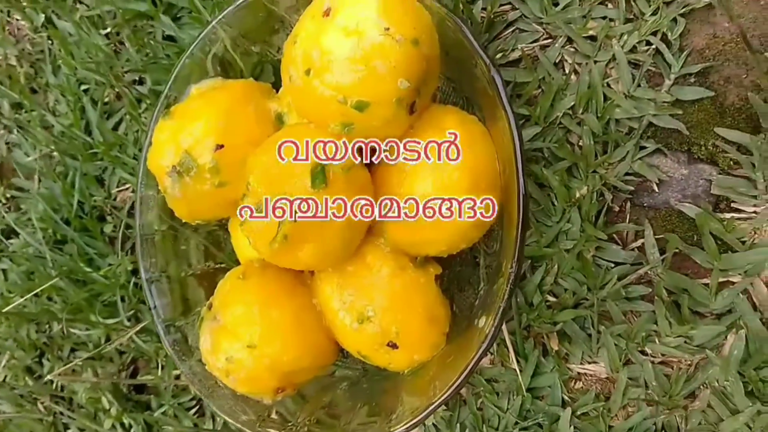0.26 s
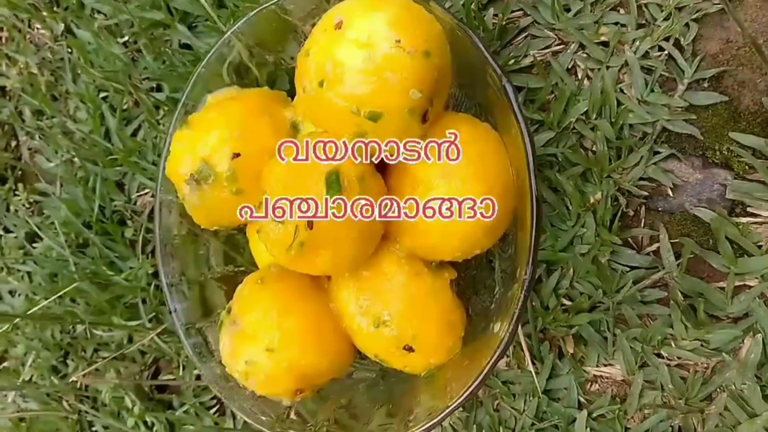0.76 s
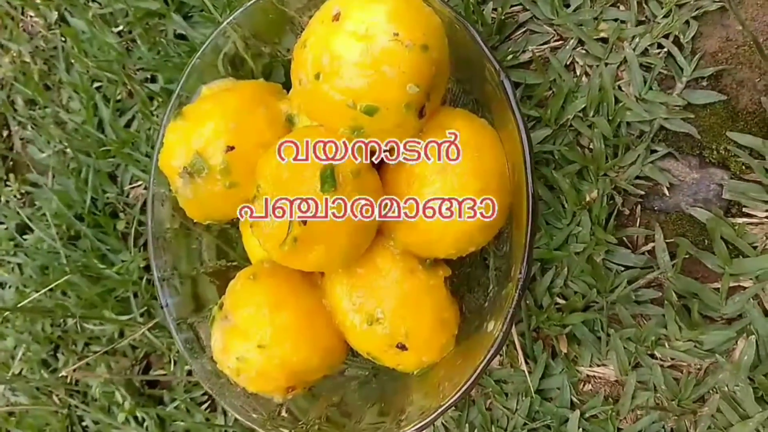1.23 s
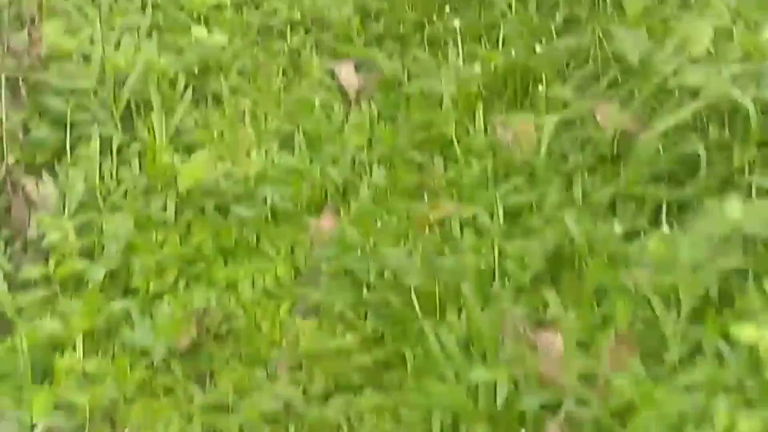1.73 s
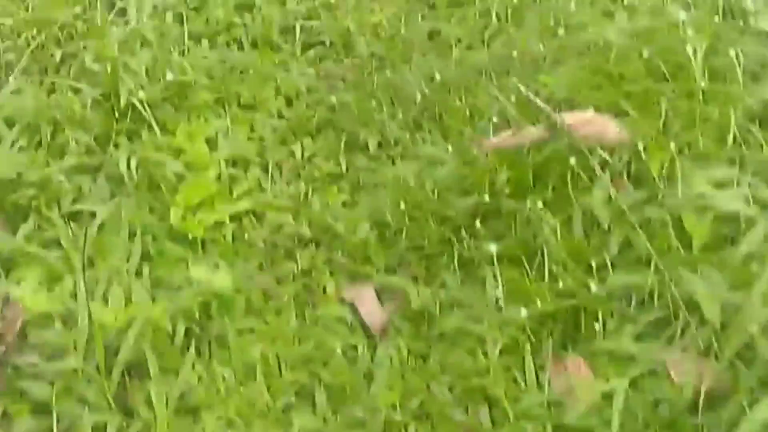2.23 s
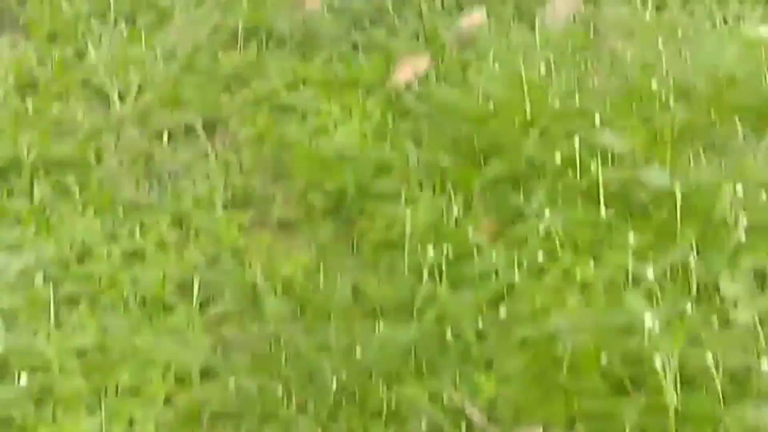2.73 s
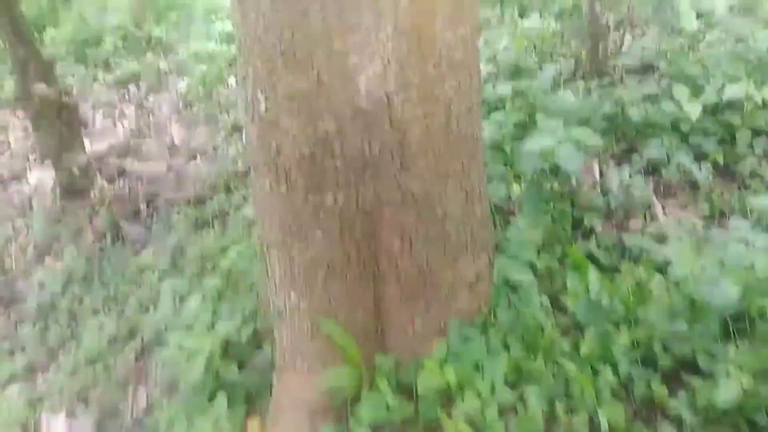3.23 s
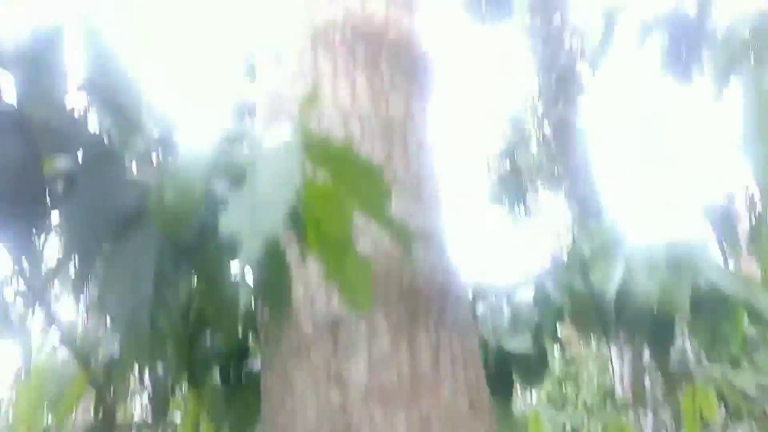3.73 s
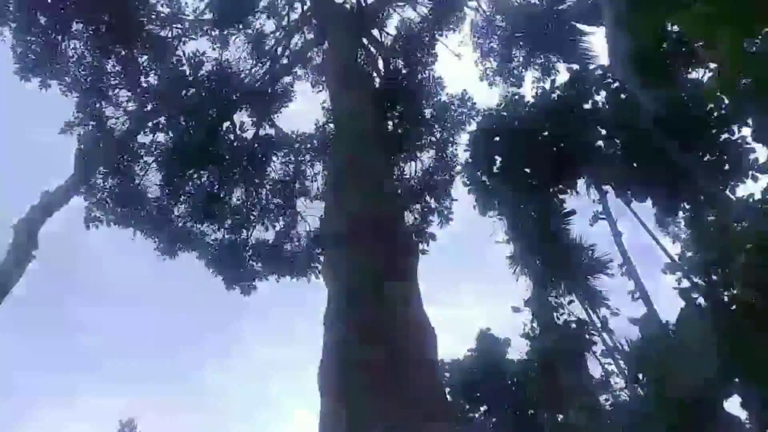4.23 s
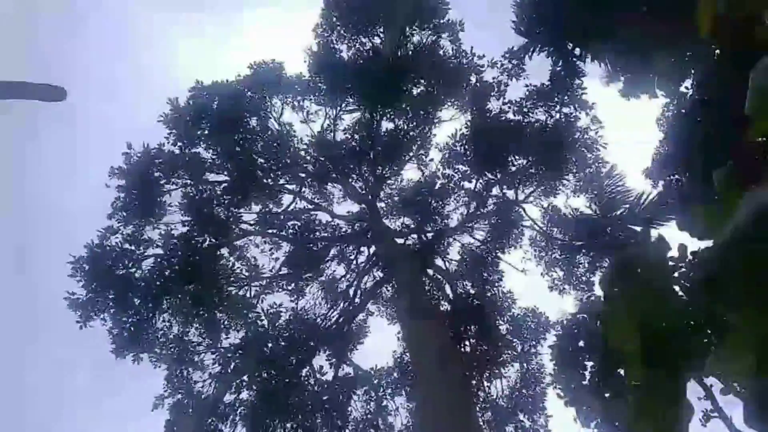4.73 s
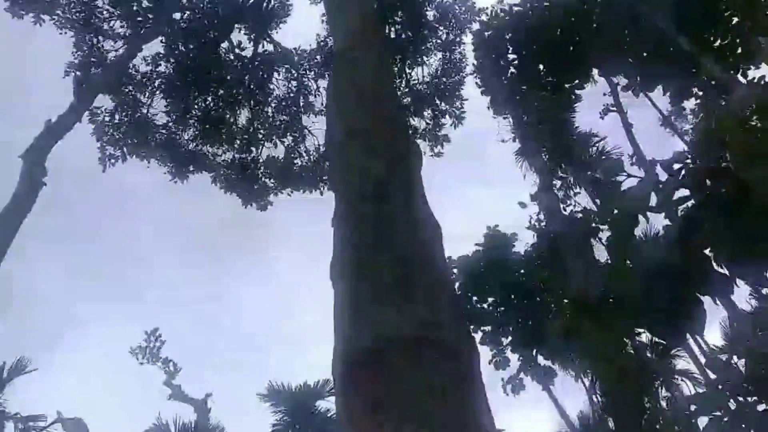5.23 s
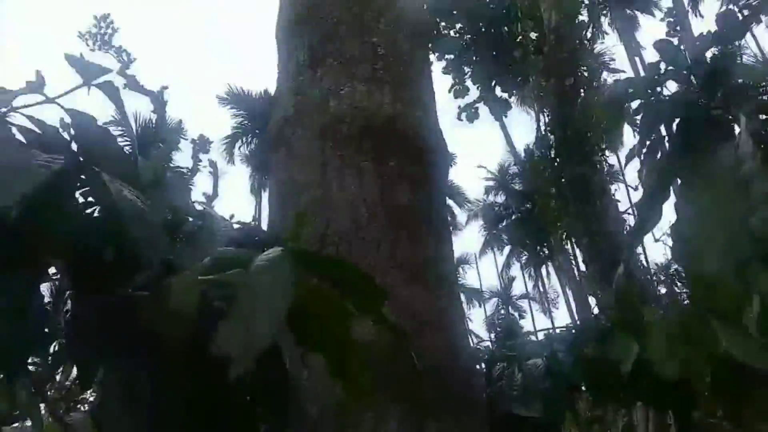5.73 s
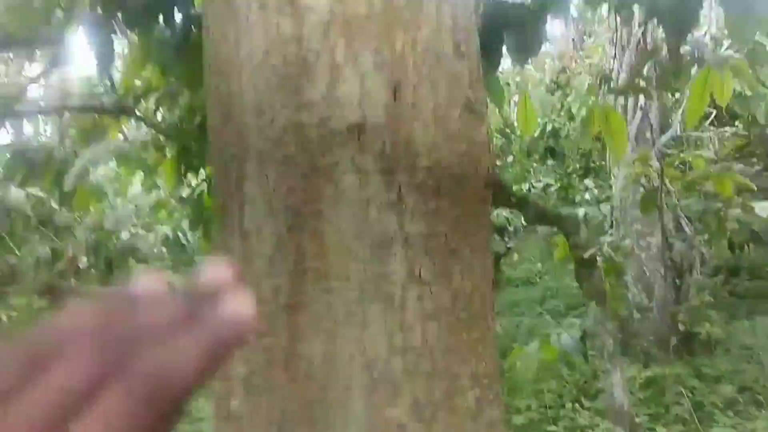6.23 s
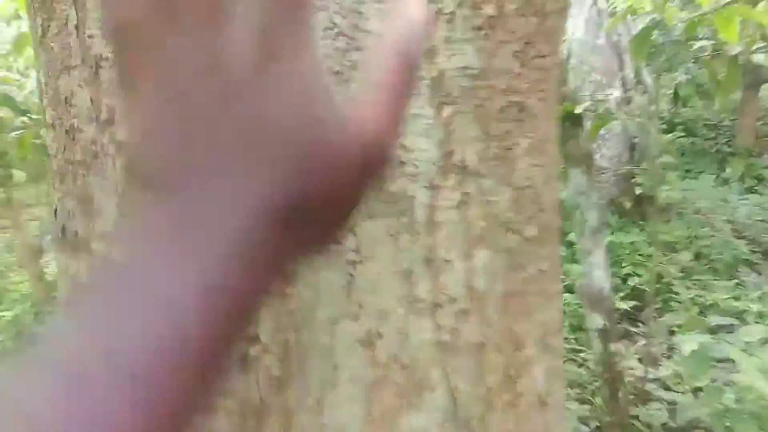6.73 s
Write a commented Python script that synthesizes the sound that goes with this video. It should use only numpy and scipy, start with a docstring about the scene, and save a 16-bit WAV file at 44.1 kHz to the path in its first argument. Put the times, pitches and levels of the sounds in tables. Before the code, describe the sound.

Woodland birdsong builds from near silence: reedy notes, a harsh buzz, quick flicks and thin whistles over bubbling water and a low rumble.

```python
"""Birdsong by a woodland brook

Birds sing among trees: sine glides make slides, whips and thin whistles; a throbbing comb of sines makes a buzz.
Others give reedy notes, two-voiced calls and a trill of quick sweeps. Short noise tails echo them off the trunks.
The brook is shaped noise with ringing bubbles, over a low noise rumble; both grow from faint, with dips.
All but the bass swings from right to left, then back near the middle."""
import sys
import numpy as np
from scipy import signal
from scipy.fft import rfft, irfft, next_fast_len
from scipy.io import wavfile
from scipy.ndimage import uniform_filter1d, map_coordinates

SR = 44100
rng = np.random.default_rng(int(sys.argv[2]) if len(sys.argv) > 2 else 0)


def log_audio(samples):
    """Write samples as a 16-bit WAV file to the path given in sys.argv[1]."""
    # one column per channel
    frames = np.atleast_2d(samples).T
    # limit to full scale, then quantise
    limited = np.clip(frames, -1, 1)
    pcm = np.round(limited * 32767).astype(np.int16)
    wavfile.write(sys.argv[1], SR, pcm)


N = 307818  # length in samples
T = np.arange(N) / SR


def amp(db):
    """Turns decibels into a plain multiplier."""
    return 10 ** (np.asarray(db) / 20)


def unit(x):
    """Scales x to an rms level of 1."""
    return x / np.sqrt(np.mean(x ** 2) + 1e-20)


def along(points, hz):
    """Reads a curve of (Hz, value) points on a log frequency axis."""
    f, v = np.transpose(points)
    return np.interp(np.log(hz + 1), np.log(f + 1), v)


def wobble(n, rate):
    """A smooth random curve with rate knots a second."""
    knots = rng.standard_normal(int(n * rate / SR) + 4)
    return map_coordinates(knots, [np.arange(n) * rate / SR])


def filtered(x, response):
    """Changes the strength of each frequency in x by response."""
    m = next_fast_len(N + SR // 2)
    return irfft(rfft(x, m) * response(np.fft.rfftfreq(m, 1 / SR)), m)[..., :N]


def add(track, start, x):
    """Mixes x into track with softened ends."""
    x = x * signal.windows.tukey(len(x), min(1, 200 / len(x)))
    track[start:start + len(x)] += x[:N - start]


# How the brook and the rumble grow and dip: (t/s, brook base level/dB, rumble level/dB)
FLOW_LEVELS = [(0, -82.5, -78), (.8, -77, -70), (1.699, -72.5, -64), (3.401, -67, -57.5),
               (4.8, -67.5, -63.5), (5.698, -66.5, -55.5), (6.98, -68.5, -55)]
# Tone colour of the rumble: (f/Hz, relative level/dB)
RUMBLE_COLOUR = [(14, -1), (32, 1.5), (55, -7.5), (100, -24.5), (160, -38), (250, -22.5), (500, -59.5)]


def rumble():
    """A distant low drone of filtered noise, nearly the same in both ears."""
    mid, side = filtered(rng.standard_normal((2, N)), lambda hz: amp(along(RUMBLE_COLOUR, hz)))
    s, _, rumble_db = np.transpose(FLOW_LEVELS)
    both_ears = np.array([mid + 0.12 * side, mid - 0.077 * side])
    return amp(np.interp(T, s, rumble_db)) * unit(both_ears)


# How long echoes ring in the wood: (f/Hz, time to fall by 60 dB t/s)
WOOD_RING = [(500, 0.046), (3000, 0.52), (8000, 0.22)]
ECHO_S = .011  # first answer of the trunks


def trees(x):
    """Scattered echoes of the trunks: fading noise, different in each ear and redrawn each quarter second."""
    out, step = np.zeros((2, N + SR)), SR // 4
    for at in range(0, N, step):
        begin = max(at - step, 0)
        hz, t, z = signal.stft(rng.standard_normal((2, SR // 2)), SR, nperseg=256)
        fade = amp(-60 * t / along(WOOD_RING, hz)[:, None])
        tail = signal.istft(z * fade, SR, nperseg=256)[1]
        # overlapping pieces blend one echo pattern into the next
        window = np.hanning(2 * step)[max(step - at, 0):][:N - begin]
        piece = x[begin:at + step] * window
        wet = signal.fftconvolve(piece[None], tail / np.linalg.norm(tail[0]), axes=1)
        out[:, begin + round(ECHO_S * SR):][:, :wet.shape[1]] += wet
    return out[:, :N]


def bubbles(rows, cycles, rise, tick):
    """Each bubble climbs in pitch and dies by 60 dB over some cycles of its starting pitch; tick adds a dry onset."""
    s, db, hz = np.transpose(rows)[:, :, None]
    t = np.arange(SR // 12) / SR
    age = t * hz / cycles
    onset = 1 - np.exp(-t / 0.00016)
    ring = amp(-60 * age) * onset * np.sin(2 * np.pi * hz * t * (1 + rise * age))
    ring += tick * np.exp(-t / .0006) * rng.standard_normal(ring.shape)
    at = np.round(s * SR).astype(int) + np.arange(len(t))
    mixed = np.bincount(at.ravel(), (amp(db) * ring).ravel(), N + SR)[:N]
    # weaken what lies below 700 Hz and above 6500 Hz
    return filtered(mixed, lambda f: 1 / (1 + (700 / (f + 1)) ** 4) / (1 + (f / 6500) ** 4))


def crowd(count, low_hz, high_hz, spread_db):
    """Scatters bubbles at random as (t/s, level/dB, f/Hz) rows."""
    u = rng.random((count, 3))
    level_db = -spread_db * np.log(1 - u[:, 1])
    return np.array([u[:, 0] * N / SR, level_db, low_hz * (high_hz / low_hz) ** u[:, 2]]).T


# Tone colour of the hissing water: (f/Hz, relative level/dB)
WATER_COLOUR = [(140, -36.5), (259, -6), (659, -9.5), (1300, -2.5), (2090, -10.5), (3260, -10.5),
                (5250, -14), (8740, -31)]
# Bubbles that burst in the brook: (t/s, level/dB before the bubble filter, starting f/Hz)
PLOP_BUBBLES = [(0.185, -54, 1208), (0.456, -47, 1423), (0.831, -47, 1330), (0.974, -43.5, 1397),
                (1.215, -50.5, 910), (1.509, -45.5, 1036), (1.888, -36.5, 1230), (2.164, -46, 1005),
                (2.207, -44, 1320), (2.709, -46.5, 974), (3.027, -37, 1400), (3.484, -45, 1307),
                (3.579, -37, 1194), (3.693, -37, 1675), (3.76, -33, 2010), (4.631, -39, 1406),
                (4.938, -37, 1208), (5.144, -34.5, 1425), (5.563, -42, 1865), (6.455, -40.5, 995),
                (6.686, -41, 1169), (6.862, -47, 722), (6.916, -43.5, 1860), (6.952, -52.5, 1455)]
# Small bright droplets: (t/s, level/dB before the bubble filter, starting f/Hz)
DRIP_BUBBLES = [(1.5967, -44, 4400), (2.169, -40, 4400), (2.3416, -47.5, 3430), (2.4778, -47.5, 2740),
                (2.6606, -46, 2580), (2.772, -35.5, 4670), (2.9183, -41, 2780), (4.605, -37.5, 4030),
                (5.0716, -39, 2790)]


def brook():
    """Water as patchy noise hiss, small gurgles and ticks of spray, with single plops and drips on top."""
    z = signal.stft(rng.standard_normal((3, N)), nperseg=512)[2]
    # blurred noise gives patches that are louder or softer in time and pitch
    patches = uniform_filter1d(uniform_filter1d(rng.standard_normal(z.shape[1:]), 6, 0), 8, 1)
    noise = signal.istft(z * amp(3.8 * unit(patches)), nperseg=512)[1][:, :N]
    shared = noise[:2] + 0.32 * noise[2]  # the third noise reaches both ears
    hiss = unit(filtered(shared, lambda hz: amp(along(WATER_COLOUR, hz))))
    gurgle_rows = crowd(count=500, low_hz=800, high_hz=3000, spread_db=2.8)
    gurgle = unit(bubbles(gurgle_rows, cycles=70, rise=.12, tick=0))
    spray_rows = crowd(count=450, low_hz=2200, high_hz=7000, spread_db=1.5)
    spray = unit(bubbles(spray_rows, cycles=30, rise=.1, tick=.5))
    s, brook_db, _ = np.transpose(FLOW_LEVELS)
    flow = amp(np.interp(T, s, brook_db))
    plops = bubbles(PLOP_BUBBLES, cycles=90, rise=.1, tick=.04)
    single = plops + bubbles(DRIP_BUBBLES, cycles=50, rise=.06, tick=.5)
    water = flow * (amp(5.0) * hiss + amp(-3) * gurgle + amp(-4) * spray)
    return water + single + amp(-15.5) * trees(single)


def glide(length_s, from_hz, to_hz, bend, crest, db, swell):
    """Pitch slides by a power law while the breath swells to its crest and fades."""
    u = np.arange(round(length_s * SR)) / (length_s * SR)
    breath = np.sin(np.pi * np.interp(u, [0, np.clip(crest, .05, .95), 1], [0, .5, 1]))
    hz = from_hz + (to_hz - from_hz) * u ** bend
    return hz, db + swell * 20 * np.log10(breath + 1e-3)


def whistle(hz, db, shake_db):
    """A sine of rms level db, raised by shake_db times a random curve like unsteady breath."""
    level = np.sqrt(2) * amp(db + shake_db * wobble(len(hz), 89.5))
    return level * np.sin(2 * np.pi * np.cumsum(hz) / SR)


# Tiny sweeps: (t/s, length t/s, centre from f/Hz, to f/Hz, bend, crest 0-1 of length, level/dB before pulsing)
TRILL_CALL = (4.69, .205, 2680, 2400, .3, .6, -55)


def trill():
    """Tiny upward sweeps in pitch, about 57 a second, each with its own pulse of loudness."""
    out = np.zeros(N)
    s, *shape = TRILL_CALL
    hz, db = glide(*shape, swell=.35)
    cycle = np.arange(len(hz)) * 56.6 / SR % 1
    sweeps = whistle(hz + 520 * (cycle - .5), db, shake_db=3.5)
    add(out, round(s * SR), 2.1 * sweeps * np.sin(np.pi * cycle) ** 0.61)
    return out


# One buzzing call: (t/s, length t/s, base level/dB)
BUZZ_CALL = (3.826, .72, -37.5)
# Partials of the buzz: (f/Hz, level/dB on top of the base, sag after the crest level/dB)
BUZZ_PARTIALS = [(3388, -18, 7), (3972, -2, 6.5), (4390, -2.5, 9.5), (4920, -11.5, 3.5), (5543, -15, 4),
                 (6070, -21.5, 5)]
BUZZ_ONSET_S, BUZZ_SWELL_S, BUZZ_SWELL_DB, BUZZ_SAG_S, BUZZ_RELEASE_S = .003, .06, 9, .2, .015


def buzz():
    """A comb of wavering partials, throbbing about 129 times a second; each throb runs down the comb."""
    out = np.zeros(N)
    s, length_s, base_db = BUZZ_CALL
    t = np.arange(round(length_s * SR)) / SR
    db = base_db - BUZZ_SWELL_DB * np.clip(1 - t / BUZZ_SWELL_S, 0, 1) ** 2
    sag = np.clip((t - 0.72 * BUZZ_SWELL_S) / BUZZ_SAG_S, 0, 1)
    gate = np.clip(np.minimum(t / BUZZ_ONSET_S, (length_s - t) / BUZZ_RELEASE_S), 0, 1)
    cycle = np.cumsum(129.3 * (1 + .015 * wobble(len(db), 40))) / SR
    comb = 0
    for hz, level_db, sag_db in BUZZ_PARTIALS:
        throb = 1 + .9 * np.cos(2 * np.pi * (cycle + hz / 1200))
        wavering = hz * (1 + .0095 * (hz / 4000) ** 2 * wobble(len(db), 260))
        comb = comb + throb * whistle(wavering, db + level_db - sag_db * sag, shake_db=2)
    add(out, round(s * SR), amp(-4.0) * gate * comb)
    return out


# High two-voiced calls that end in flutters: (t/s, base level/dB, pitch ratio)
SEEP_CALLS = [(3.302, -67, .955), (6.483, -48.5, 1)]
# The lower voice, before the pitch ratio
SEEP_S, DIVE_HZ, DIVE_S, FLOOR_HZ, CLIMB_HZ_PER_S = .185, 2300, .022, 6700, 4300


def seep():
    """Both sides of the syrinx, a bird's voice box, sound at once: a dive, then a slow fluttering climb."""
    out = np.zeros(N)
    _, db = glide(SEEP_S, 1, 1, 1, crest=0.23, db=-3.5, swell=1.0)  # only its loudness is used
    t = np.arange(len(db)) / SR
    hz = FLOOR_HZ + DIVE_HZ * np.exp(-t / DIVE_S) + CLIMB_HZ_PER_S * t
    # the flutter sets in after the dive
    beat = np.clip((t - .07) / 0.092, 0, 1) * np.sin(2 * np.pi * 33 * t)
    for s, base_db, ratio in SEEP_CALLS:
        for upper, voice_db in [(1, 7.5), (1.085, -2.5)]:
            wavering = (hz + 160 * beat) * (1 + .009 * wobble(len(hz), 200))
            voice = whistle(wavering * ratio * upper, db + base_db + voice_db + 6 * beat, shake_db=3.0)
            add(out, round(s * SR), voice)
    return out


# Reedy held notes: (t/s, length t/s, base level/dB, lift of all but the second partial level/dB)
REED_NOTES = [(3.039, 0.174, -41, -7.5), (3.548, .175, -49, 0)]
# Partials of the reedy note: (partial number, level/dB on top of the base)
REED_MIX = [(1, -15), (2, 0), (3, -12.5)]
REED_HZ, REED_ARCH_HZ = 3390, 30  # second partial, and how far its pitch arches up
REED_CREST, REED_SWELL = 0.26, .35  # crest as a share of the length, sharpness of the swell


def reed():
    """A low, rough fold vibration whose partials shake together."""
    out = np.zeros(N)
    for s, length_s, base_db, lift_db in REED_NOTES:
        hz, db = glide(length_s, REED_HZ, REED_HZ, 1, REED_CREST, base_db, REED_SWELL)
        hz = (hz + REED_ARCH_HZ * np.hanning(len(hz))) * (1 + .0055 * wobble(len(hz), 300))
        db = db + 2.3 * wobble(len(hz), 259)
        note = 0
        for k, level_db in REED_MIX:
            partial_db = db + level_db + lift_db * (k != 2)
            note = note + whistle(hz * k / 2, partial_db, shake_db=-0.5)
        add(out, round(s * SR), note)
    return out


# Each syllable is one or more glides, before the changes made when it is sung: (length t/s, from f/Hz, to f/Hz,
# bend: over 1 moves late, crest 0-1 of length, level/dB, delay t/s if not first)
SYLLABLE_GLIDES = { "tip-chew-flick": [(.023, 6880, 6720, 1.6, .7, -41),
                   (.029, 4640, 4230, 2, .8, -25.5, .037), (.017, 4150, 3300, 1.3, .3, -32, .064),
                   (.007, 4500, 6900, 1.3, .35, -40, .078)], "whip": [(.019, 4200, 7200, .36, .17, -37.5)],
                   "slide": [(.048, 3330, 2620, 1.2, .35, -43.5), (.032, 2520, 2340, .6, .5, -47, .044)],
                   "plunge": [(.024, 3130, 2680, 1.1, .35, -40), (.03, 2580, 2330, .7, .4, -45, .03)],
                   "slant": [(.08, 3750, 2450, .8, .5, -60)], "drop": [(.032, 3540, 3280, 1.1, .5, -30.5),
                   (.052, 3280, 2500, .7, .45, -41, .03)], "dip": [(.03, 2300, 1800, .9, .4, -49)],
                   "thin": [(.24, 5500, 5450, 1.1, .3, -64)], "climb": [(.09, 1070, 1640, 1.1, .4, -57),
                   (.4, 1540, 2470, 1.6, .55, -60.5, .07)], "soar": [(.39, 1690, 3150, 1.1, .2, -62)],
                   "rise": [(.06, 3000, 3500, 2.2, .45, -63), (.064, 3500, 4720, .7, .82, -54.5, .056)],
                   "fall": [(.135, 7300, 5000, 1.7, .85, -75)], "curl": [(.055, 5300, 3450, 1.8, .6, -72),
                   (.11, 3350, 4030, .5, .75, -69, .055)], "warble": [(.12, 7300, 6950, .4, .4, -72)],
                   "rasp": [(.085, 4550, 6000, 1.1, .3, -67)]}
# When each syllable is sung: (t/s, added level/dB, pitch ratio where it differs from 1)
SONG_TIMES = {"tip-chew-flick": [(4.581, 0), (4.949, -3), (5.199, -2)], "whip": [(5.44, 0), (5.646, 1),
              (5.864, 3)], "slide": [(5.544, 0), (5.751, 0)], "plunge": [(5.982, 0)], "slant": [(5.94, -2),
              (6.43, 0), (6.803, 0), (.82, -9, 1.45)], "drop": [(3.224, 0), (3.709, -4)],
              "dip": [(5.128, -1), (5.376, 0)], "thin": [(6.3, 0), (6.69, -2, .985)], "climb": [(6.055, 0)],
              "soar": [(5.14, 0)], "rise": [(.52, -5), (.692, 0), (.85, 0), (1.008, -3, 1.02),
              (1.19, -4.5)], "fall": [(.05, -9, .94), (.225, -3), (.41, 0), (.568, -2)],
              "curl": [(.025, -4, .93), (.28, 0)], "warble": [(.465, 0)], "rasp": [(.015, -7, .9),
              (.745, 0)]}
FAR_UNTIL_S, FAR_BLUR, RASP_BLUR, FAR_ECHO_DB = 1.4, .009, .045, 3  # blurs are shares of the pitch
CLOSE, CLOSE_ECHO_DB = "tip-chew-flick", -5  # this singer sits close, so its echo is weaker
SWELL, SWELL_S = 1.8, .03  # sharpness of the swell for a glide this long; longer glides are flatter


def songs():
    """Whistled syllables; air blurs the far birds heard first. Rows: direct, sent to the trees."""
    out = np.zeros((2, N))
    for name, sung in SONG_TIMES.items():
        for s, gain_db, *ratio in sung:
            far = s < FAR_UNTIL_S
            blur = RASP_BLUR if name == "rasp" else FAR_BLUR * far
            echo_db = CLOSE_ECHO_DB if name == CLOSE else FAR_ECHO_DB * far
            for row in SYLLABLE_GLIDES[name]:
                length_s, delay_s = row[0], sum(row[6:])
                hz, db = glide(*row[:6], SWELL * np.sqrt(SWELL_S / length_s))
                hz = hz * np.prod(ratio) * (1 + blur * wobble(len(hz), 400))
                shake_db = 8 * length_s + .7 + 120 * min(blur, .02)
                voice = whistle(hz, db + gain_db, shake_db)
                start = round((s + delay_s) * SR)
                add(out[0], start, voice)
                add(out[1], start, amp(echo_db) * voice)
    return out


# Where the scene sits between the ears, before smoothing: (t/s, left minus right level/dB)
SIDE_TO_SIDE = [(0, -12.5), (1.5, -1.5), (3, 7), (4.8, 13), (5.5, 12), (6.2, 1.34), (6.98, 0.85)]


def swing(x):
    """Level and arrival time move between the ears; a scene well to one side is louder and earlier there."""
    pan_db = uniform_filter1d(np.interp(T, *np.transpose(SIDE_TO_SIDE)), SR // 4)
    lag = 0.868 * (pan_db - 3.5)  # samples: one ear this much early, the other this much late
    gains = 2 / (1 + amp([-pan_db, pan_db]))
    left = map_coordinates(x[0], [np.arange(N) + lag])
    right = map_coordinates(x[1], [np.arange(N) - lag])
    return gains * np.array([left, right])


BASS_HZ = 476  # below this the head casts no shadow


def scene():
    """Birds, their echoes and the brook swing from side to side; their bass and the rumble stay put."""
    birds, sent = songs() + reed() + seep() + buzz() + trill()
    # a random wobble in delay smears the pitch of the echoes
    delayed = map_coordinates(sent, [np.arange(N) + 2.7 * wobble(N, 200)])
    wood = birds + amp(-10) * trees(delayed) + brook()
    bass = filtered(wood, lambda hz: 1 / (1 + (hz / BASS_HZ) ** 4))
    return swing(wood - bass) + bass + rumble()


SCENE_HZ, TOP_HZ = 8900, 15700  # the scene ends near the first; faint hiss reaches on to the second


def record(dry):
    """The scene ends near 8.9 kHz; faint hiss reaches on to 15.7 kHz, and a small constant offset is added."""
    heard = filtered(dry, lambda hz: 1 / (1 + (hz / SCENE_HZ) ** 40))
    hiss = amp(-90.5) * rng.standard_normal(dry.shape)
    return filtered(heard + hiss, lambda hz: hz < TOP_HZ) - .0006


dry = scene()
out = record(dry)
log_audio(out)
```